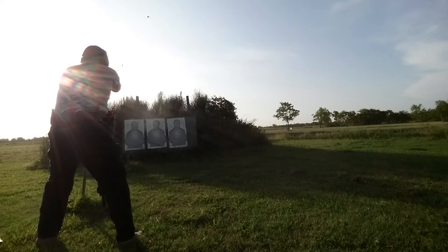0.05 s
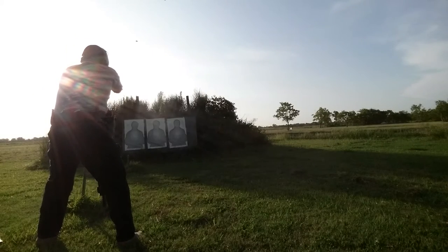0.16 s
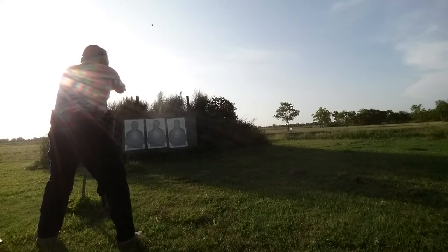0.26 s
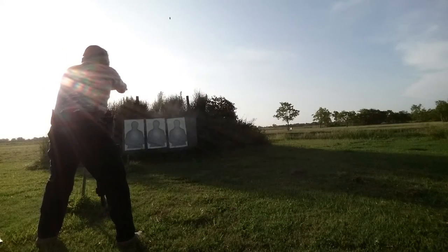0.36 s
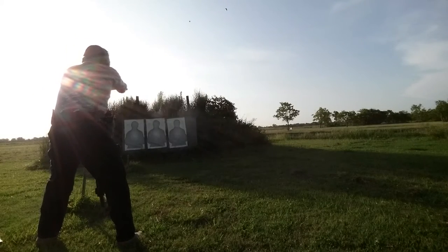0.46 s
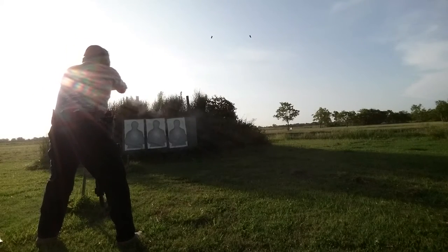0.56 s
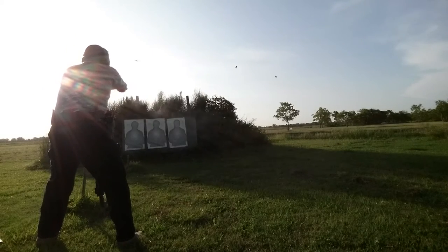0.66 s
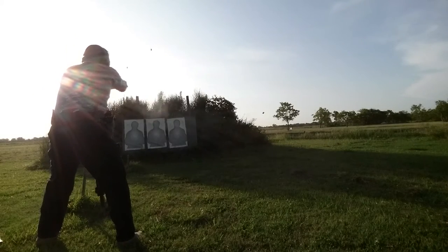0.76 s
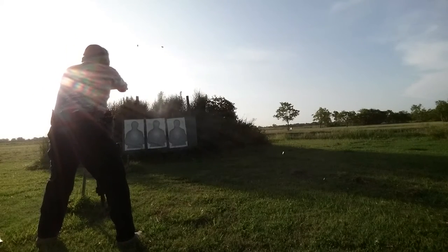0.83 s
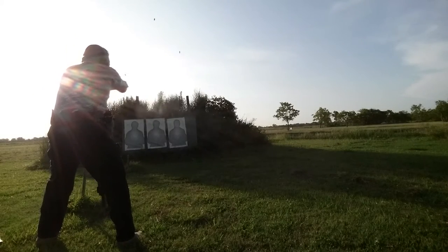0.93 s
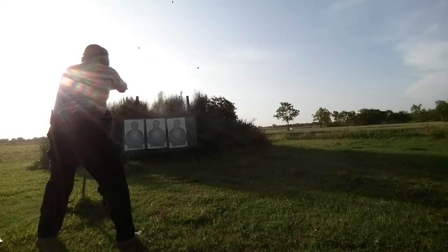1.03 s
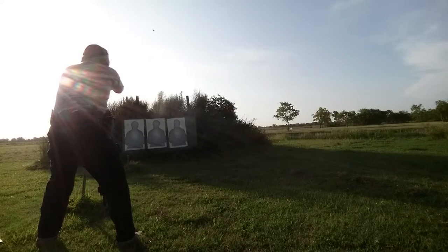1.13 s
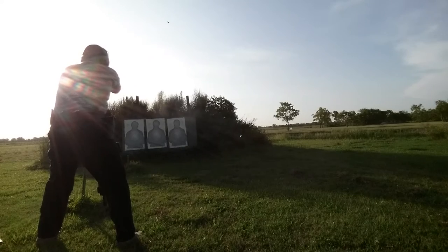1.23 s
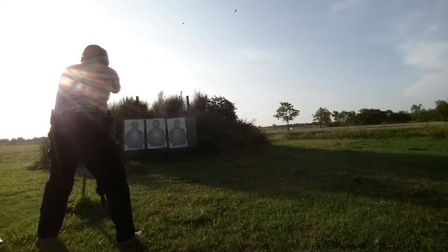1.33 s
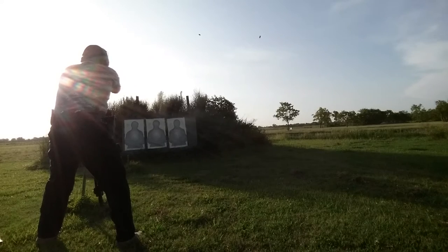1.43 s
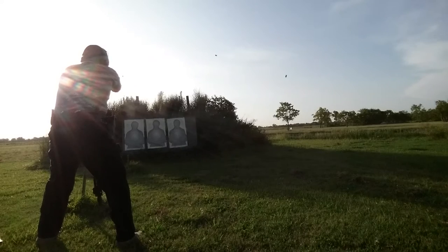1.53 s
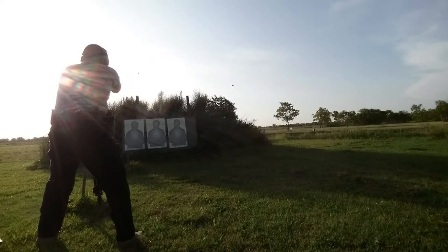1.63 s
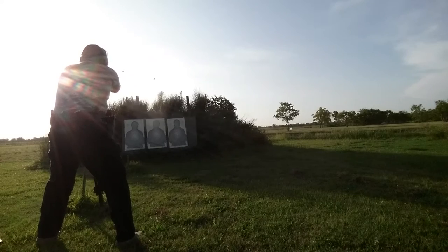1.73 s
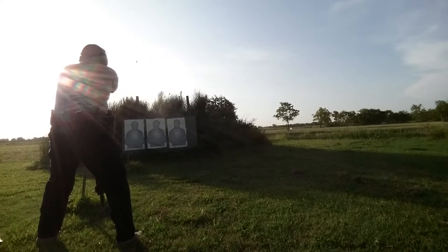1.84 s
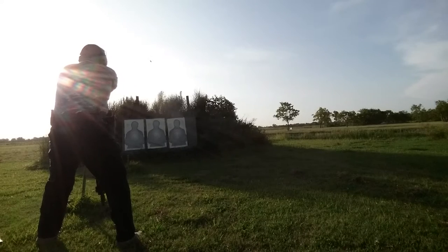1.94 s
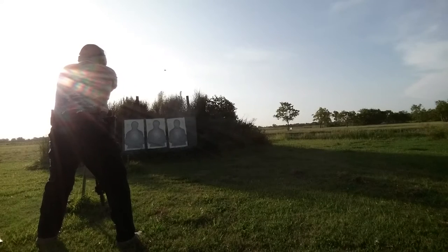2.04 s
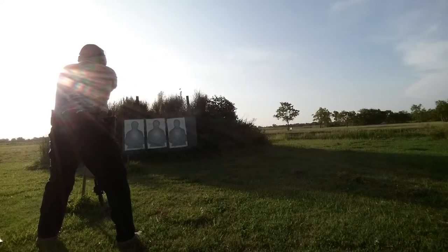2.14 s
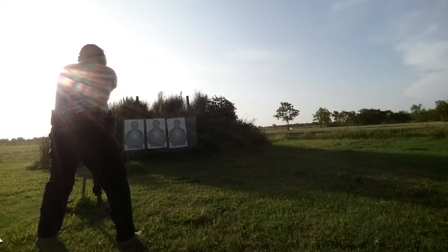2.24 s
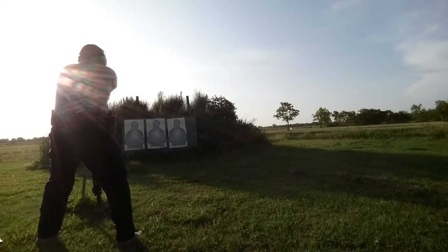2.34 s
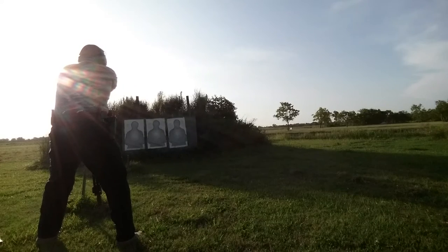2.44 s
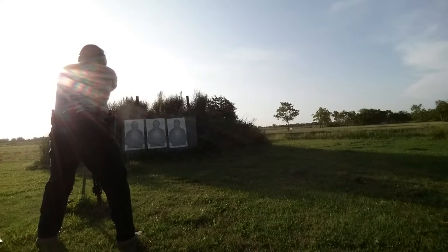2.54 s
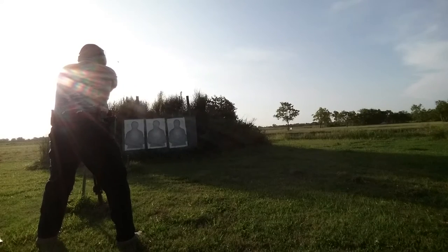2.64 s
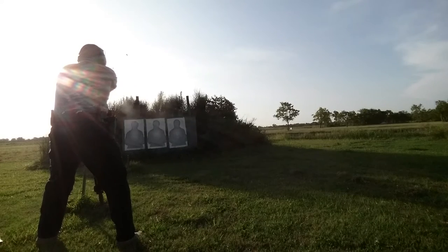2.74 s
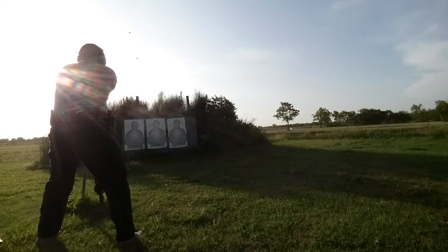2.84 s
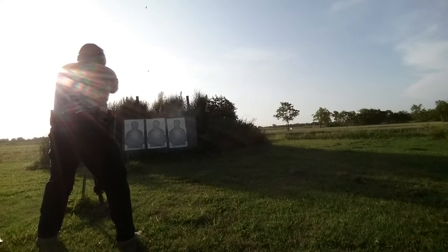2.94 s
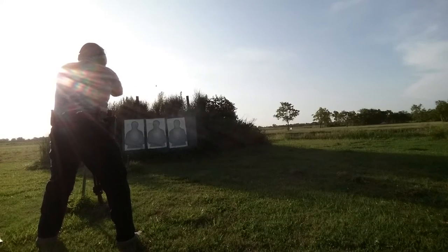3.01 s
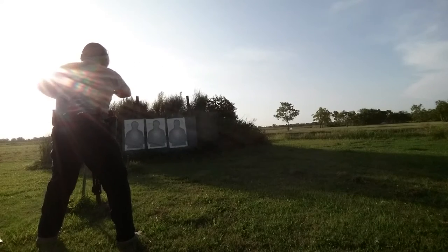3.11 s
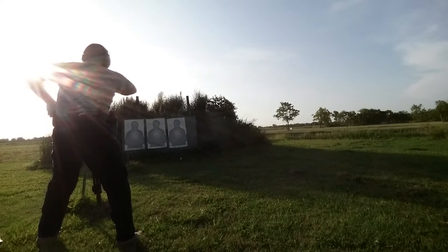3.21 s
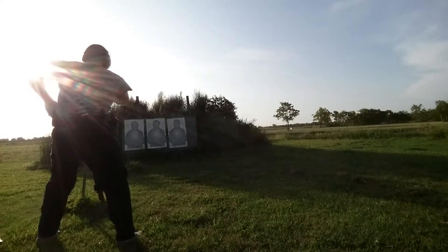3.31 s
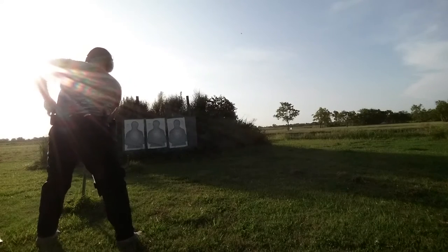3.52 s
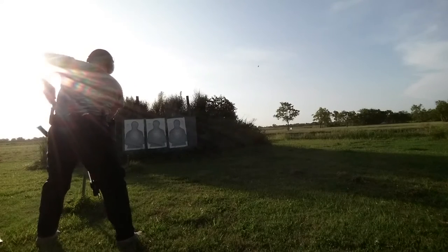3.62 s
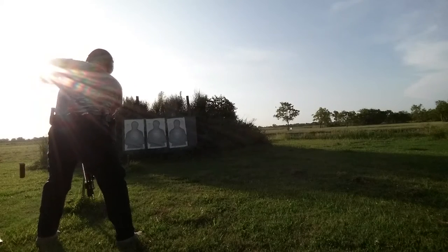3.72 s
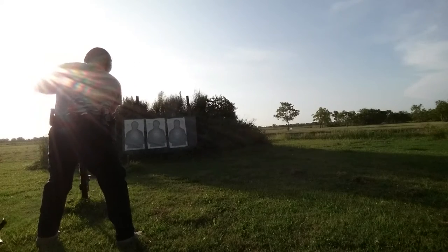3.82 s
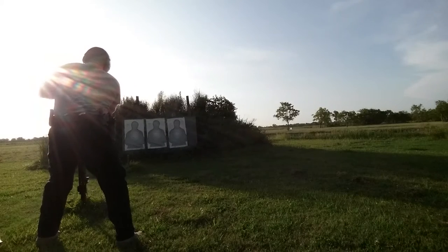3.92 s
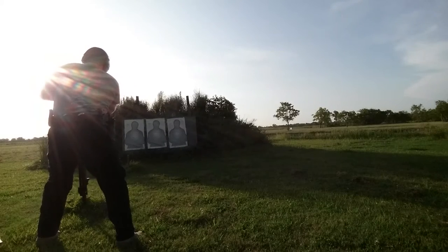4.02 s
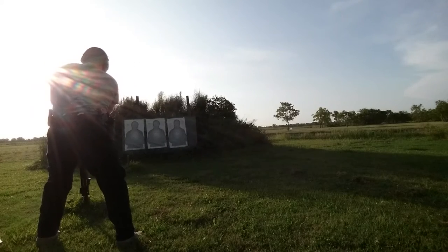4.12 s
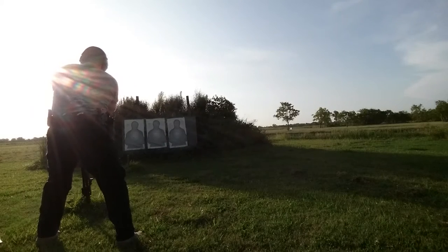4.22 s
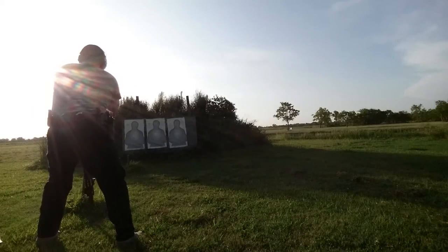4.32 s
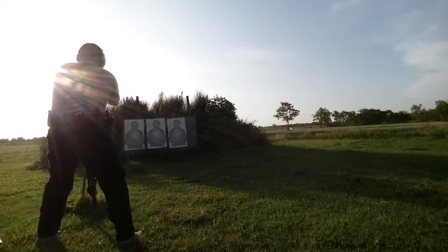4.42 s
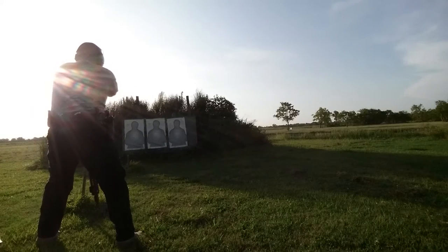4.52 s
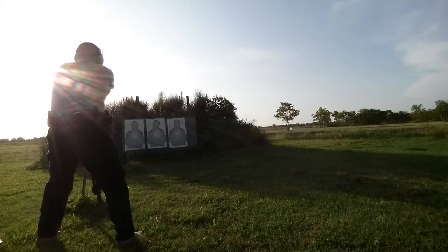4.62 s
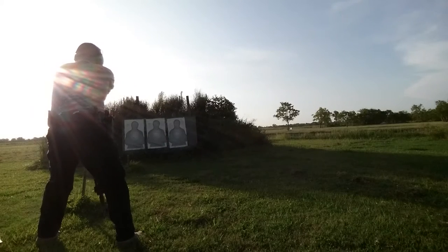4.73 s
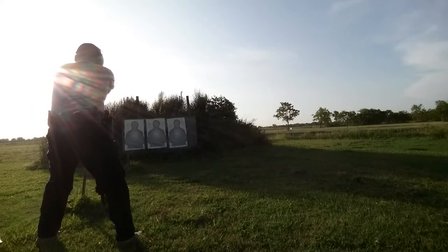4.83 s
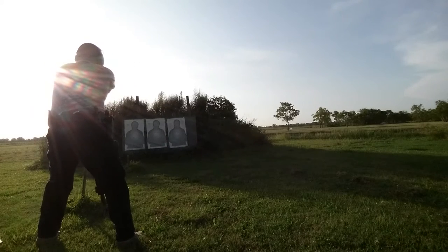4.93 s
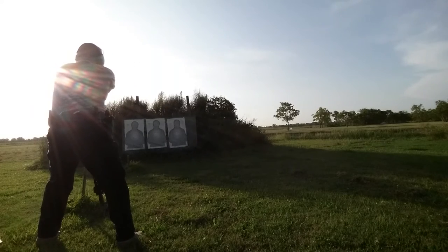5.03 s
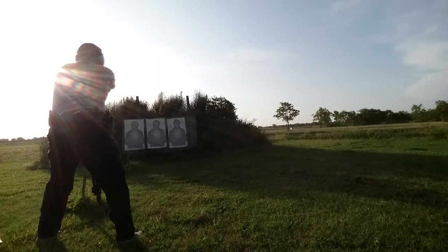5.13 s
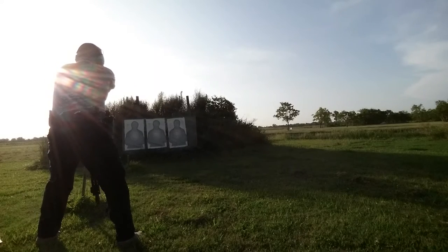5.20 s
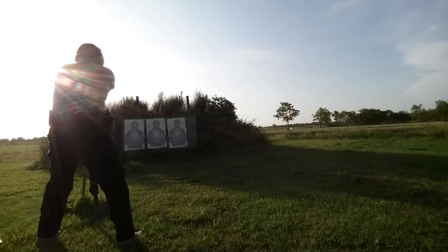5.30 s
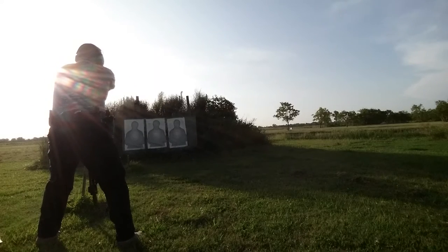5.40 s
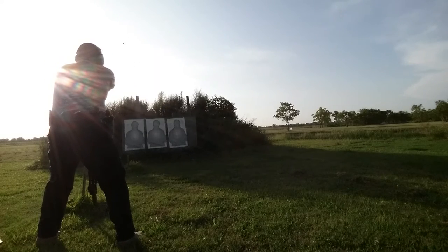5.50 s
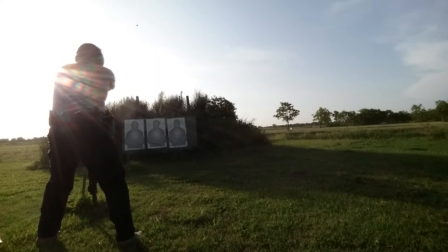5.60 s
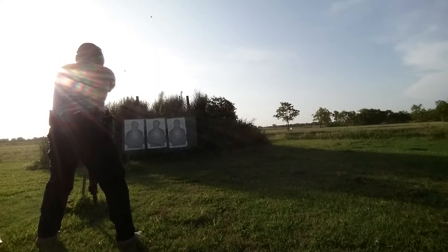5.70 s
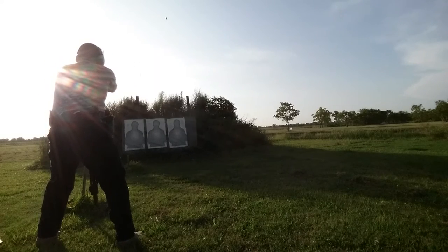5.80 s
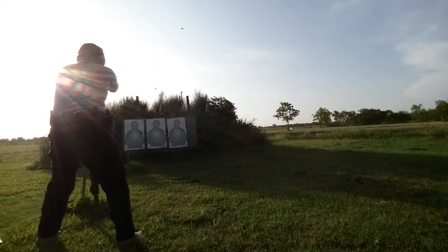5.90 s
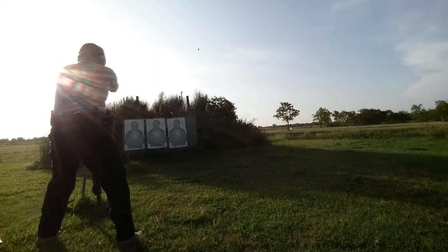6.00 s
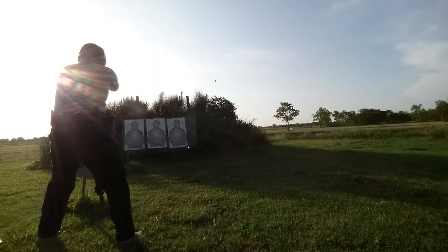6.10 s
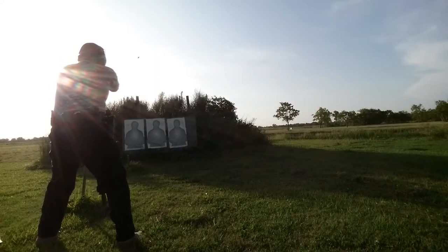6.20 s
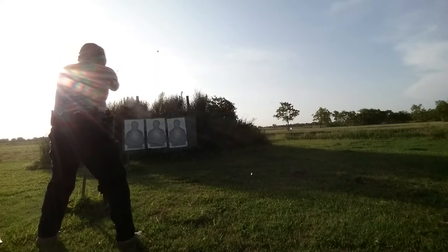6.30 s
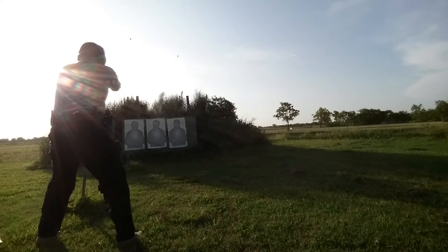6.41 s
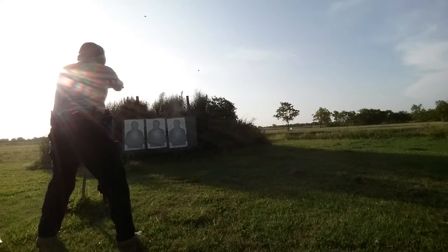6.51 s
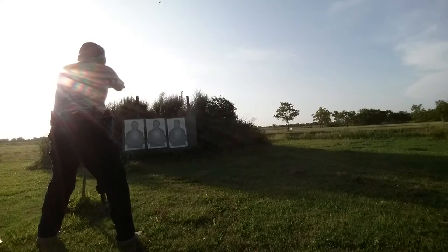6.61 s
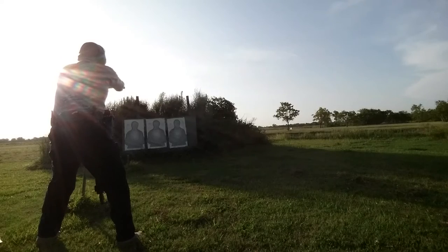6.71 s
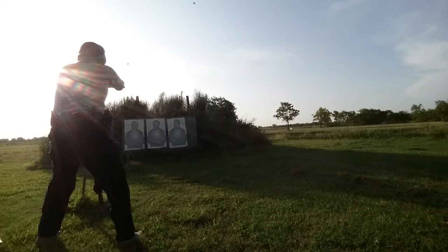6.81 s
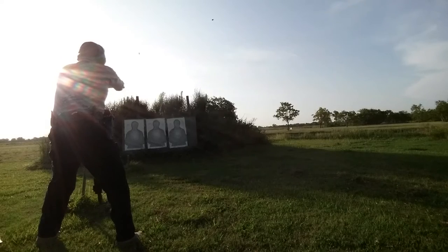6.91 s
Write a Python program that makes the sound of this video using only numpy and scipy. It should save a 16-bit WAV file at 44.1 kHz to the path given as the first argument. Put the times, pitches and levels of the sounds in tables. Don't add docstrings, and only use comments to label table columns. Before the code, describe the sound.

The fading roll of an earlier blast leads into rapid semi-automatic rifle fire, close and overloaded, with an almost immediate hard echo and a thin distant tail. Firing stops for nearly three seconds; a magazine is changed with crisp metallic clicks, a thud and light rattle under buffeting wind. Then shots resume in pairs and a last single, in open air on a small stereo camera microphone.

```python
import sys
import numpy as np
from scipy import signal
from scipy.fft import rfft, irfft, next_fast_len
from scipy.io import wavfile
from scipy.ndimage import uniform_filter1d

SR = 44100
rng = np.random.default_rng(int(sys.argv[2]) if len(sys.argv) > 2 else 0)


def wav_record(signal):
    frames = np.transpose(np.atleast_2d(signal))
    bounded = np.clip(frames, -1, 1)
    quanta = np.round(bounded * 32767).astype(np.int16)
    wavfile.write(sys.argv[1], SR, quanta)


def invert_db(level):
    return 10 ** (np.asarray(level, dtype=float) / 20)


N = 306495
TIME = np.arange(N) / SR

# start in seconds, level in dB, relative gas hiss in dB, bank echo in dB,
# hiss of the bank echo in dB.
SHOTS = [(0.0995, -1.5, 1, -0.5, 8), (0.6515, -1.5, -7, 2.5, -5), (0.8202, -0.5, -1, 2, 0.5),
         (1.0031, 0, 1.5, 3, 3), (1.5818, -1.5, -8, 1.5, -1), (1.7695, 0, -3, 1.5, 3),
         (2.6204, -3, -19.5, 0.5, -4), (2.8099, -0.5, -6, -2.5, 1.5), (5.461, 0, -7.5, -3.5, 0),
         (5.6606, -1, -3, 0.5, 5), (6.158, -1.5, -4, -1.5, 0.5), (6.373, -0.5, -3.5, -0.5, 4),
         (6.8174, -1, -1, 1.5, 4)]
EARLIER_SHOT = (-.0655, -1, -8, 0, 3)
# frequency in Hz, level in dB per Hz.
BODY = [(150, -2), (270, -1.5), (450, -2.5), (900, 0), (1300, -7), (2000, -2.5), (3000, -12.5), (4500, -29),
        (8000, -30.5)]
# frequency in Hz, level in dB per Hz.
TREES = [(200, 4), (500, -5), (1000, 3.5), (1400, 1), (1900, 6), (2600, 0), (3300, -10.5), (4000, -8),
         (5000, -18), (8000, -26)]


def colour(x, points):
    hz, db = np.transpose(points)
    f = np.fft.rfftfreq(x.shape[-1], 1 / SR) + 1
    gain = invert_db(np.interp(np.log(f), np.log(hz), db)) * np.minimum(f / hz[0], 1) ** 2
    return irfft(rfft(x) * gain, x.shape[-1])


def noise(points, size, alike, lag_ms=0.):
    mid, side = colour(rng.standard_normal((2, next_fast_len(size))), points)[:, :size]
    share = np.clip(alike, 0, 1)
    pair = np.sqrt(1 + share) * mid + np.sqrt(1 - share) * side * np.array([[1], [-1]])
    pair[0] = np.roll(pair[0], int(round(lag_ms * SR / 1000)))
    return pair / pair.std()


def add(out, x, s):
    i = int(round(s * SR))
    x = x[:, max(-i, 0):N - i]
    out[:, max(i, 0):max(i, 0) + x.shape[1]] += x


def pan(db):
    return invert_db(np.array([db, -db]) / 2)


def swell(t, peak, rise, hold, t60, db):
    climb = 30 * np.maximum(peak - t, 0) / max(rise, 1e-4)
    decay = 60 * np.maximum(t - peak - hold, 0) / max(t60, 1e-3)
    return invert_db(db - climb - decay)


def ring(hz, t60, s):
    s = np.maximum(s, 0)
    return np.sin(2 * np.pi * hz * s) * np.exp(-np.log(1000) * s / t60)


def fronts(table, ms, wobble_ms=.1, rise_ms=.15):
    out = 0
    for (at, half, *size), chance in zip(table, rng.standard_normal((len(table), 3))):
        u = np.maximum(ms - at - wobble_ms * chance[0], 0)
        wave = (1 - np.exp(-u / rise_ms)) * (1 - u / half) * np.exp(-u / half)
        out = out + (np.array(size) * (1 + 0.067 * chance[1:]))[:, None] * wave
    return out


def far_share(ms):
    return np.clip((ms - 75) / 60, 0, 1)


def shot(same, gas_db, bank_db, bank_gas_db, size=57600):
    # delay in ms, half length in ms, signed size left, right.
    near_fronts = [(.5, 1.3, -.2, -.6), (2.1, 1.2, .3, 1.4), (2.9, 1.3, -1.0, -2.3), (3.9, 1.8, .8, 0),
                   (5.2, 1.5, 0, .8)]
    bank_fronts = [(34.3, 1.0, -.8, -1.2), (35.5, 1.5, .7, 1.5), (39, 1.0, -.5, -.5), (48, .5, .08, .25),
                   (58, .5, .08, .25), (76, .5, .1, .15)]
    # frequency in Hz, left level in dB, right level in dB, t60 in seconds.
    modes = [(658, -13, -22.5, 0.041), (180.5, -29.5, -26, 0.16), (1902, -19, -15, 0.021)]
    # arrival in ms, hold in ms, t60 in ms, body in dB, treble in dB.
    returns = [
        (0.4, 3.2, 18, -6, -9.5),
        (0.4, 13, 72, -26, -21.5),
        (34.24, 0.23, 19, 1.5, -12),
        (33.3, 43, 113, -26.5, -28),
        (202, 120, 790, -47, -54.5),
        (99.7, 140, 2200, -63, -61),
    ]
    echo_ms = [48, 58, 76, 122, 217.5, 248, 269.5, 275, 334, 367, 418]
    # level in dB, smear in ms, treble in dB.
    echoes = [(-21, 0.68, -9.5), (-21, 2.5, -9), (-25, 2.6, -10), (-34.5, 1.5, -2), (-39, 5.7, -14),
              (-40.5, 4.4, -9), (-30, 2.9, -5), (-43, 9.0, -11.5), (-42, 2.5, -7), (-38, 1.1, -24),
              (-34.5, 1.9, -26.5)]
    # frequency in Hz, level in dB per Hz.
    port_colour = [(3000, -10), (5000, -8.5), (7500, -24.5), (9500, -9.5), (11300, 1.5), (13000, 4),
                   (15000, -4), (15700, -5.5), (16100, -43)]
    rise_ms, blur_ms = 0.96, 100
    air_db_per_s, air_from_ms = 65, 290

    ms = np.arange(size) / SR * 1000
    body, treble = 0, 0
    for at, hold, t60, body_db, treble_db in returns:
        shape = swell(ms, at + rise_ms, rise_ms * (1 + (at / blur_ms) ** 2), hold, t60, 0)
        body = body + invert_db(body_db) * shape
        treble = treble + invert_db(treble_db) * shape
    treble = treble * invert_db(-air_db_per_s * np.maximum(ms - air_from_ms, 0) / 1000)

    bank_ms = bank_fronts[0][0]
    since_front = np.where(ms < bank_ms, ms, ms - bank_ms)
    pan_db = -1.5 + 10 * np.exp(-since_front / 4.7)

    near, bank = ms < 30, (ms >= 33.8) & (ms < 46)
    body = body * invert_db(bank_db * bank + 0.34 * (gas_db + 9.0) * near)
    treble = treble * invert_db(gas_db * near + bank_gas_db * bank)
    for delay, (db, smear, air_db) in zip(echo_ms, echoes):
        burst = invert_db(db) * np.exp(-np.maximum((ms - delay) / smear, (delay - ms) / smear * 3))
        body = body + burst
        treble = treble + burst * invert_db(air_db)

    far = far_share(ms)
    fresh = (1 - far) * noise(BODY, size, 0.2, lag_ms=.3) + far * noise(TREES, size, 0.09, lag_ms=.3)
    scatter = body * (0.36 * fresh + 0.55 * same) * pan(pan_db - 2.0)
    tree_line = (ms > 200) & (ms < 280)
    hiss = treble * noise(port_colour, size, 0.31, lag_ms=.12) * pan(pan_db - 4.5 * tree_line)

    rings = 0
    for hz, left_db, right_db, t60 in modes:
        struck = ring(hz, t60, ms / 1000 - .0039) + .6 * ring(hz, t60, ms / 1000 - .036)
        rings = rings + invert_db(np.array([[left_db], [right_db]])) * struck
    return fronts(near_fronts, ms) + invert_db(bank_db) * fronts(bank_fronts, ms) + rings + scatter + hiss


def rifle(size=57600):
    trigger_lead_s = .0016
    out = np.zeros((2, N))
    patches = np.repeat(rng.standard_normal(size // 120 + 1), 120)[:size]
    clumps = invert_db(6 * uniform_filter1d(patches, size=160))
    ground = clumps * noise([(100, 0.006), (10000, 0.0036)], size, 0.56, lag_ms=0.28)
    far = far_share(np.arange(size) / SR * 1000)
    same = (1 - far) * colour(ground, BODY) + far * colour(ground, TREES)
    same = same / same.std()
    for s, db, *rest in [EARLIER_SHOT] + SHOTS:
        add(out, invert_db(db + 1.5) * shot(same, *rest), s + trigger_lead_s)
    return out


def wind():
    # peak in seconds, left level in dB, right level in dB, t60 in seconds.
    gusts = [(.01, -70, -35.5, 1), (0.306, -43, -34, 0.18), (0.469, -33.5, -32, 0.13),
             (0.512, -41, -27.5, 1.2), (1.439, -57, -28, 2.6), (1.74, -44, -31.5, 2.4),
             (1.862, -36, -27, 1.5), (1.981, -59, -27.5, 0.98), (2.11, -89, -29.5, 0.81),
             (2.212, -46, -25.5, 0.43), (2.397, -42.5, -26, 0.096), (2.52, -51, -25, 0.44),
             (2.719, -46, -27.5, 0.66), (2.958, -50, -29.5, 0.12), (3.051, -56, -34.5, 1.5),
             (3.298, -51.5, -34, 0.055), (3.367, -65, -33.5, 0.39), (3.581, -68.5, -43, 1.3),
             (4.018, -65, -29.5, .35), (4.13, -50, -30, 1.2), (4.25, -40, -26.5, 0.15),
             (4.574, -59, -20.5, 0.19), (4.67, -58, -29, 0.51), (4.91, -49, -33.5, 0.91),
             (5.03, -60, -21.5, 0.25), (5.299, -42.5, -19.5, 1.2), (5.399, -39.5, -24.5, 0.93),
             (5.85, -38, -33.5, 0.21), (6.101, -70, -35.5, 1.3), (6.25, -42.5, -38, 5.7)]
    # time in seconds, left level in dB, right level in dB,
    # reach of the flutter in dB.
    breeze = [(0, -55, -53, 2.5), (.7, -45, -30.5, 11.5), (1.05, -42, -37, 3), (1.45, -57.5, -36.5, 10),
              (2.4, -57, -47, 0.5), (3.2, -68.5, -49.5, 4.5), (3.8, -58, -54.5, -6.5),
              (4.2, -57.5, -58, -6), (4.7, -57, -39.5, -16.5), (5.4, -45, -33.5, -7.5),
              (5.75, -50.5, -38.5, 2.5), (6.7, -62, -50, -4), (6.95, -52, -78.5, -9)]

    s, *ports, reach_db = np.transpose(breeze)
    slow = TIME[::32]
    gain = invert_db(np.array([np.interp(slow, s, port) for port in ports]))
    snap = 0
    for at, left_db, right_db, t60 in gusts:
        shape = swell(slow, at, 0.027 + 0.071 * t60, 0, t60, 0)
        gain = np.maximum(gain, invert_db(np.array([[left_db], [right_db]])) * shape)
        snap = snap + swell(slow, at, .03, 0, 0.054, 3)
    snap = np.interp(TIME, slow, snap)
    gain = np.array([np.interp(TIME, slow, port) for port in gain])

    low = noise([(45, -3.0), (70, 1), (120, -5.5), (200, -19.0), (400, -56.5), (1000, -83.0)], N, 0)
    low = low / np.sqrt(uniform_filter1d(low ** 2, size=2200) + 0.21)
    high = noise([(120, 2.5), (200, -0.5), (330, -11.5), (550, -26), (1200, -69.0)], N, 0)
    eddies = np.repeat(invert_db(5 * rng.standard_normal((2, N // 900 + 1))), 900, axis=1)[:, :N]
    bursts = uniform_filter1d(eddies, size=600)
    thumps = low * bursts ** 0.092
    reach = np.sqrt(gain) * invert_db(4.03 + np.interp(TIME, s, reach_db))
    flutter = high * (0.77 * bursts + snap) * reach
    return gain * (thumps + flutter)


def field():
    # time in seconds, level in dB.
    hiss_level = [(3.9, -92), (4.0, -74), (4.45, -73), (4.75, -77.5), (5.3, -67), (5.46, -71.5),
                  (5.47, -93)]
    fired = np.array([row[0] for row in [EARLIER_SHOT] + SHOTS])
    since = TIME - fired[np.searchsorted(fired, TIME) - 1]
    air = noise([(300, 2.5), (500, -5.5), (900, -9), (2000, -18.5), (9000, -43.0)], N, 0.2)
    hiss = noise([(8500, -36.5), (10000, -12.5), (10600, 2.5), (11700, -13), (12600, 1.5), (15300, 0.5),
                  (15700, 3.0), (16100, -27.0)], N, .1)
    return invert_db(-56.5 + 6.6 * (since - 4.5)) * air + invert_db(np.interp(TIME, *np.transpose(hiss_level))) * hiss


def reload(size=8000):
    # start in seconds, treble in dB, relative thud in dB,
    # left minus right in dB, t60 in seconds.
    handling = [(3.9485, -30.5, 4.5, -4.5, 0.054), (3.9741, -24, -3, -1.5, 0.051),
                (4.0103, -45.5, -1, 1, 0.096), (4.2276, -29.5, -7.5, -1, 0.049),
                (4.2632, -36, -20, 10, 0.091), (4.2844, -38, -7, -6, 0.047), (4.2941, -17, -30, 11, 0.04),
                (4.3277, -25.5, -36.5, 5.5, 0.065)]
    # peak in seconds, rise before it in seconds, hold in seconds,
    # t60 in seconds, level in dB.
    shakes = [(3.964, 0.0058, .002, 0.18, -52), (4.047, 0.045, .002, .09, -59.5), (4.26, .06, .02, .3, -63),
              (4.283, 0.0044, 0.0015, 0.045, -33.5), (4.294, .01, 0.0033, 0.31, -45),
              (4.097, .05, 0.25, 0.98, -67)]
    # frequency in Hz, level in dB, t60 in seconds.
    spring_modes = [(14110, -60, 0.4), (5600, -82, 0.2)]
    spring_s = (4.115, 4.228)
    # frequency in Hz, level in dB per Hz.
    click_colour = [(1500, -10), (2200, -12), (3500, -15), (6000, -21.5), (8500, -25), (10500, -9),
                    (13100, 4.5), (14300, -4.5), (15700, -8.5), (16100, -35)]
    hollow = [(200, -10.0), (350, 3.0), (600, 4.5), (1100, -7), (1300, -2), (1600, -41), (2500, -17),
              (5000, -43.5)]

    out, s = np.zeros((2, N)), np.arange(size) / SR
    for at, db, thud_db, pan_db, t60 in handling:
        decay = np.exp(-np.log(1000) * s / t60) + .5 * np.exp(-s / 0.0021)
        click = noise(click_colour, size, 0.18) * decay * (1 - np.exp(-s / 0.00046))
        modes = 12.5 * ring(494, 0.007, s - .0008) + 1.3 * ring(860, 0.0092, s - .0008)
        thud = (1 - np.exp(-(s / 0.0016) ** 2)) * modes
        thud = thud + 1.22 * noise(hollow, size, 0.44) * np.exp(-s / 0.0095)
        add(out, invert_db(db - 10.5) * pan(pan_db)[:, None] * (click + invert_db(thud_db) * thud), at)

    slow = TIME[::16]
    shaking = np.interp(TIME, slow, sum(swell(slow, *row) for row in shakes))
    rattle = shaking * noise(click_colour, N, 0.14) * pan(1.8)[:, None]

    spring = 0
    for hz, db, t60 in spring_modes:
        for at in spring_s:
            pair = ring(hz, t60, TIME - at) + 0.3 * ring(hz + 45, t60, TIME - at)
            spring = spring + invert_db(db) * pair
    return out + rattle + spring


def scene():
    return rifle() + wind() + field() + reload()


def top_cut(x):
    return signal.sosfilt(signal.butter(12, 16820, fs=SR, output="sos"), x)


def record(dry):
    stall_s = (5.4985, 5.519)
    x = .8 * np.tanh(1.2 * dry / .8)
    stalled = uniform_filter1d(1. * ((TIME > stall_s[0]) & (TIME < stall_s[1])), size=40)
    x[1] = x[1] * invert_db(-24 * stalled) + .4 * ring(40, 0.05, TIME - stall_s[0])
    x = signal.sosfilt(signal.butter(1, 30, "high", fs=SR, output="sos"), x)
    x = signal.sosfilt(signal.ellip(6, .5, 60, 16100, fs=SR, output="sos"), x)
    x = np.tanh(x + x ** 3 / 3)
    return top_cut(x)


dry = scene()
out = record(dry)
wav_record(out)
```